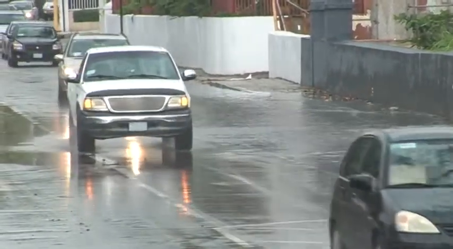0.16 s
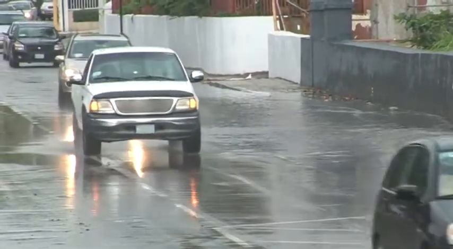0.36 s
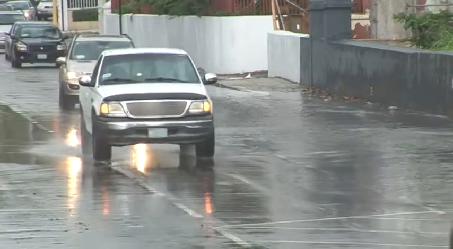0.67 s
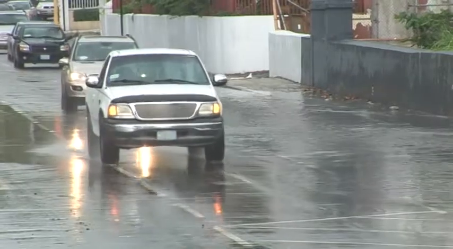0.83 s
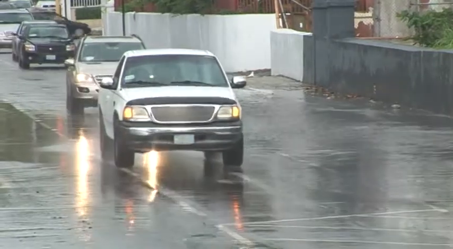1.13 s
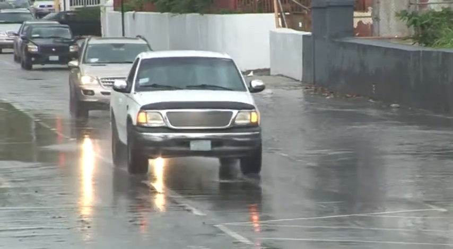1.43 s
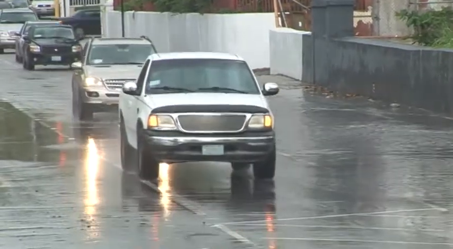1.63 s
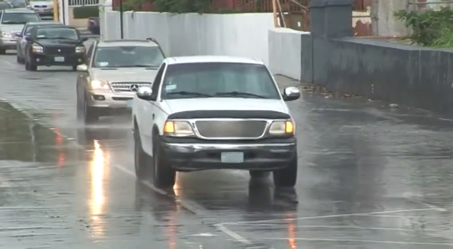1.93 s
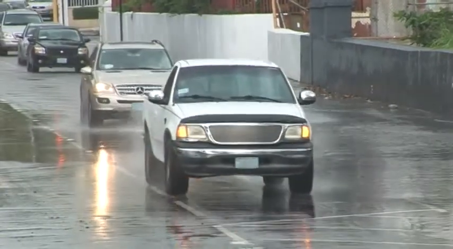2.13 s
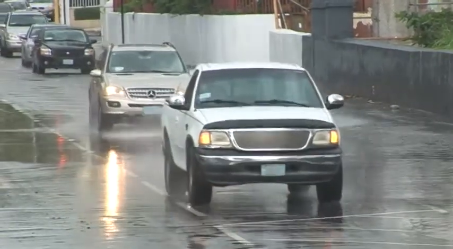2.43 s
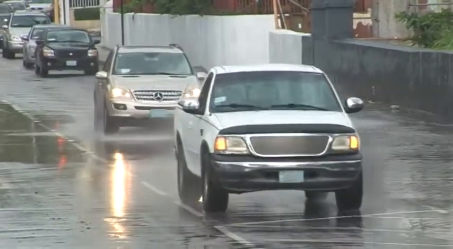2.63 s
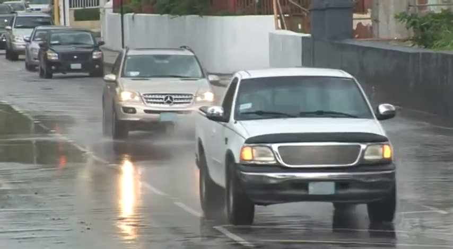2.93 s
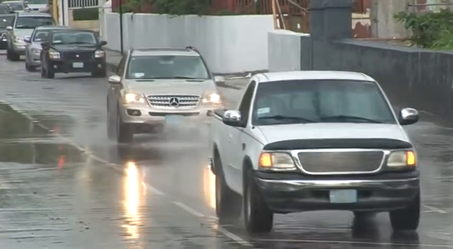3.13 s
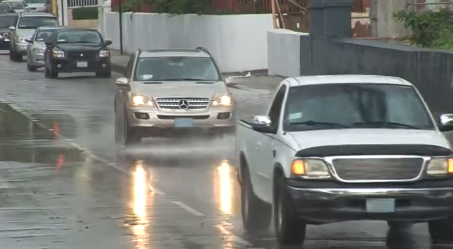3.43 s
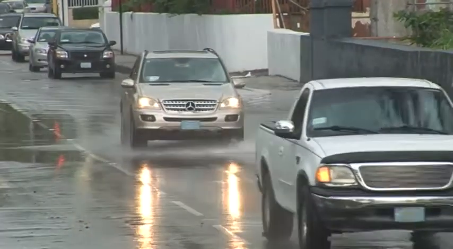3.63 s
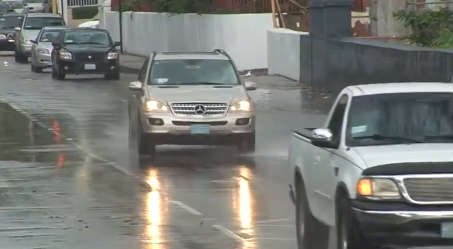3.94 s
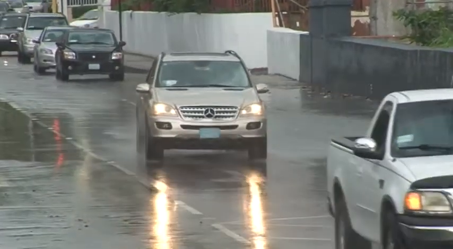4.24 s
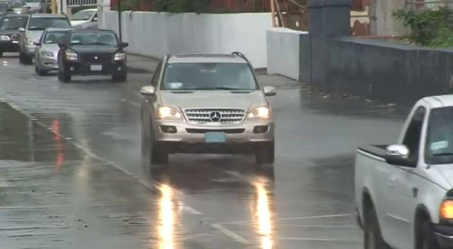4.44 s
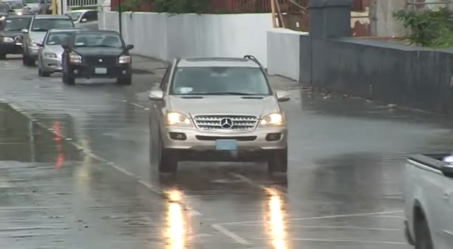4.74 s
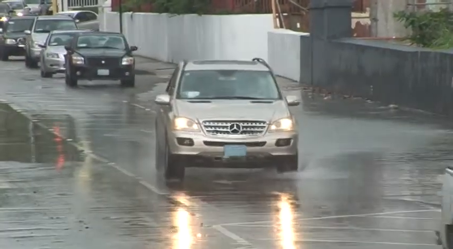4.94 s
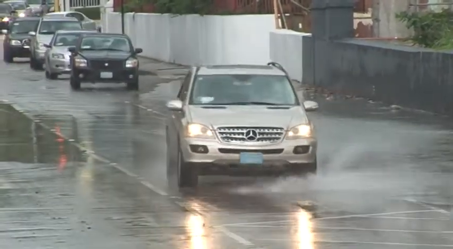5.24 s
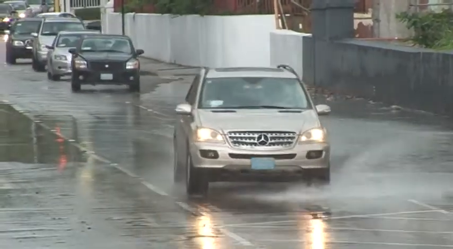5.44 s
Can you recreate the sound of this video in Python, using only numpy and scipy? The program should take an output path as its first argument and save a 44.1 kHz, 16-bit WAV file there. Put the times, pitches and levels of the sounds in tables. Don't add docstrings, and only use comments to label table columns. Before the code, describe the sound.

Steady wet-road tyre roar with watery surges; a pickup swells past on the right, engine humming, with a faint thin brake squeal.

```python
import sys
import numpy as np
from scipy import signal
from scipy.fft import rfft, irfft, next_fast_len
from scipy.io import wavfile
from scipy.ndimage import uniform_filter1d, map_coordinates

SR = 44100
rng = np.random.default_rng(int(sys.argv[2]) if len(sys.argv) > 2 else 0)


def inscribe(sig):
    pcm = np.round(np.clip(np.atleast_2d(sig).T, -1, 1) * 32767)
    wavfile.write(sys.argv[1], SR, pcm.astype(np.int16))


def volts_from_decibels(level):
    exponent = np.asarray(level, float) / 20
    return 10 ** exponent


N = 246519
STEP = 64
T_S = np.arange(N) / SR

IDLE_TONE = 84.3, -.45, -48, [(.75, .35, -40), (1.5, .7, -42), (2.9, .5, -45), (3.6, .3, -41),
             (4.2, .5, -36.5), (4.85, .4, -39), (5.59, .35, -34.5)]
DRONE_TONE = 146.5, -.95, -49, [(.4, .8, -45), (2.8, .25, -36.5), (3.4, .25, -39.5), (4.65, .5, -39.5),
              (5.4, .3, -45)]
PICKUP_TONE = 54.5, 2.8, -62, [(2.2, .25, -45), (2.7, .4, -45), (3.3, .4, -38), (3.9, .3, -41),
               (4.7, .3, -47)]
LEAVING_TONE = 168, -5, -70, [(.12, .25, -43)]
WHINE_TONES = [
    (292, 1.1, -75, [(.8, .4, -51)]),
    (360, -9.5, -75, [(3.85, .15, -47), (4.15, .15, -40.5), (4.6, .15, -45)]),
]
# t/s, half width/s, level/dB
EXHAUST_SWELLS = [
    (2.9, .2, -42),
    (3.58, .17, -34),
    (4.1, .35, -36.5),
    (5.5, .3, -43),
]
# f/Hz, density/dB
RUMBLE_SPECTRUM = [(12, -20), (22, -13), (30, -6), (45, 1.5), (65, -2.5), (100, -2), (128, -2.5),
                   (170, -6.5), (260, -56)]
BOOM_SPECTRUM = [(110, -18), (150, -0.5), (190, 0), (260, -0.5), (330, -6.5), (400, -12), (600, -37)]

# t/s, length/s, start f/Hz, end f/Hz, level/dB
SQUEALS = [
    (3.84, 0.038, 11960, 11850, -51),
    (4.08, .08, 11870, 11850, -62),
    (4.257, .3, 11720, 11830, -55),
]

# f/Hz, width/Hz, resting level/dB, swells [t/s, half width/s, level/dB], lean right/1
GROOVE_BANDS = [
    (556, 88, -54, [(1, .4, -53), (2.35, .25, -46), (2.8, .35, -41.5), (4.4, .3, -50)], .23),
    (1056, 190, -58, [(2.3, .45, -45), (3.05, .5, -41), (4.4, .55, -42)], .57),
]

# t/s, tyre level/dB, bearing/1 (0 ahead, 1 abeam right), nearness/1
PICKUP_PASS = [(0, -45.5, .35, .1), (.9, -42.3, .3, .4), (1.5, -39.3, .1, .17), (2, -38.5, .05, .36),
               (2.3, -36.5, .03, .56), (2.6, -35, .4, .5), (2.9, -32.8, .6, .66), (3.2, -32.8, .9, .55),
               (3.4, -34.5, 1, .8), (3.6, -36, 1, .61), (4.05, -36.3, .9, .45), (4.5, -38.6, .4, .22),
               (4.85, -40, .4, .15), (5.59, -38.8, .2, .2)]
# f/Hz, density/dB
FAR_ROAR_SPECTRUM = [(180, -23), (300, -19.5), (317, -19), (453, -4), (553, -5.5), (648, -7), (816, -11.5),
                     (979, -2.5), (1190, -5), (1490, -6), (2000, -4.5), (2600, -19), (4400, -120)]
NEAR_ROAR_SPECTRUM = [(180, -35), (300, -14.5), (325, -3), (402, -2.5), (536, -1), (623, -3.5), (778, -3.5),
                      (1030, 1), (1340, -8.5), (1610, -5.5), (2000, -25.5), (2600, -38), (4400, -120)]
# f/Hz, density/dB
SIDE_ROAR_SPECTRUM = [(35, -50), (60, -28), (241, -7), (319, -2), (407, -0.5), (676, -1.5), (923, 0),
                      (1440, 0), (1780, -6), (3000, -11), (3900, -37), (6600, -120)]
SIDE_PASS_SPECTRUM = [(35, -74), (60, -44), (121, -30), (195, -18), (319, -9), (363, -12), (496, -9),
                      (986, 0.5), (1280, -5.5), (2200, -15.5), (3000, -22), (3900, -49), (6600, -120)]
# f/Hz, in-phase share/1, quarter-cycle share/1
ROAR_COUPLING = [(100, 0.01, 0.18), (250, 0.53, -0.19), (400, -0.26, -0.64), (600, -0.19, -0.81),
                 (850, -0.37, -0.58), (1050, -0.48, -0.37), (1300, -0.21, -0.4), (1550, -0.97, 0.16),
                 (1900, -1, 0.0), (2500, -0.38, -0.2)]
WATER_COUPLING = [(1500, -0, -0.04), (1900, -0.6, -0.09), (2300, -0.6, -0.21), (2900, -0.16, -0.15),
                  (3500, 0.5, -0.16), (4000, 0.4, -0.24), (4500, -0.1, -0.3), (5000, -0.4, -0.26),
                  (5600, -0.15, -0.11), (6500, -0.06, -0.12), (7500, -0.09, -0.09)]
MIST_COUPLING = [(7500, -0.09, -0.09), (8500, -0.48, 0.18), (9500, -0.34, 0.22), (10500, -0.4, 0.16),
                 (11500, -0.57, -0.09), (12500, -0.6, -0.18), (13500, -0.62, -0.08), (14500, -0.53, 0.01),
                 (15500, -0.33, -0.14)]

# f/Hz, density/dB
SWISH_SPECTRUM = [(1300, -36), (1700, -7), (2150, 0.5), (2400, -1), (2600, 0), (2950, -4.5), (3300, -5),
                  (3800, -11.5), (4300, -22)]
SPLASH_SPECTRUM = [(1300, -38), (1800, -13), (2100, 1), (2400, 4), (2700, -5.5), (3100, 0), (3600, -7),
                   (4000, -9), (4400, -28)]
HISS_SPECTRUM = [(3300, -21), (3900, 0), (4600, -9), (5000, 0), (5450, -13), (5900, -9), (6500, -14),
                 (7600, -28)]
FAR_MIST_SPECTRUM = [(4470, -21), (7600, -10), (7810, -7), (8800, -5), (9760, -4.5), (10700, -3.5),
                     (11400, -1), (11900, 0), (13100, -4.5), (13800, -5), (15800, -11)]
NEAR_MIST_SPECTRUM = [(4470, -36), (7600, -19), (7810, -4), (8910, -12.5), (10600, -3), (11400, -4.5),
                      (12000, -2), (13400, 0), (14800, 6), (15200, 0), (15800, -12)]
# f/Hz, density/dB
SIDE_SWISH_SPECTRUM = [(1300, -28), (1750, 0), (2300, -7), (3000, -10), (3500, -15), (3900, -30)]
SIDE_HISS_SPECTRUM = [(3000, -32), (3500, -9), (4000, -3.5), (4600, -3.5), (5100, -7), (5800, -0.5),
                      (6500, -5.5), (7400, -20), (7700, -30)]
SIDE_MIST_SPECTRUM = [(4350, -36), (7400, -10), (8500, 0), (8950, 1.5), (10600, -8), (12200, -4),
                      (13700, -3.5), (15800, -12)]
# t/s, peak level/dB
BIG_DROPS = [(0.4923, -40), (0.5467, -38), (0.6285, -36), (0.7667, -36), (1.8836, -32), (2.5706, -41),
             (2.8988, -32), (3.1592, -34), (4.6209, -38)]
# t/s, swish level/dB
WATER_DEPTH = [(0, -39.3), (.6, -37.3), (1.5, -36.5), (1.9, -35.5), (2.5, -37.5), (3.56, -36.5), (4.1, -39),
               (5.1, -37.3), (5.59, -39)]
# t/s, length/s, coarse gain/dB, fine gain/dB
PUDDLE_HITS = [(.02, .05, 2.5, 1.2), (.42, .04, 2.5, 2.5), (.56, .05, 1.2, 2.2), (.685, .045, 4, 5),
               (.78, .05, 1.2, 2.5), (.94, .13, .3, 4), (1.14, .035, 2.5, 2.5), (1.36, .04, .6, 2.5),
               (1.665, .085, 7.5, 5.5), (1.85, .06, 1.2, 3), (1.97, .07, 1.2, 4.5), (2.1, .028, 3.5, 8),
               (2.44, .05, 1.5, 2.5), (2.6, .08, .3, 2.5), (2.74, .1, -.3, 2.5), (2.87, .1, -.6, 4),
               (3.03, .06, -.6, 4.5), (3.32, .04, -.3, 2.5), (3.53, .025, -1.5, -3), (3.66, .05, .6, 1.5),
               (3.87, .2, .3, 3), (4.4, .15, .3, 3), (4.95, .15, .6, 2.5), (5.16, .05, .3, 2.2),
               (5.45, .07, .6, .6)]
# level/dB (0: depth mean), depth follow/1, fade/(dB/s), coarse share/1, fine share/1,
# wake gain/dB, sideways level/dB, extra abeam/dB
SWISH_LAYER = (0, 1, 0, 1, 0, 0, -15, 7)
HISS_LAYER = (-47.8, .1, .2, .5, .05, 2.6, 1.6, .1)
SPRAY_LAYER = (-51.9, .3, -.42, .1, .95, 8.5, -1.4, .1)

# start t/s, end t/s, dip depth/dB
TREBLE_DIPS = [
    (1.59, 2.17, -14),
    (2.23, 2.67, -13),
    (2.73, 2.87, -11),
    (2.98, 3.1, -6),
    (3.3, 3.85, -3.5),
]

AHEAD_DB, ABEAM_DB = -9, 1.1
FAR_DB, NEAR_DB = -48, -24
RUMBLE_DB, RUMBLE_SWING_DB = -43.5, 11
BOOM_DB, BOOM_SWING_DB = -46, 7
WAKE_S, WAKE_FULL_S, WAKE_END_S, WAKE_FALL_S = 3.02, 3.32, 3.7, .1
RISE_SHARE = .6


def unit(x):
    return x / np.sqrt(np.mean(x ** 2) + 1e-20)


def curves(rows):
    t_s, *columns = np.transpose(rows)
    return [np.interp(T_S, t_s, column) for column in columns]


def along(rows, hz):
    f_hz, *columns = np.transpose(rows)
    return [np.interp(np.log(hz + 1), np.log(f_hz + 1), column) for column in columns]


def smooth(slow):
    return np.interp(np.arange(N), np.arange(0, N, STEP), slow)


def wobble(rate_hz):
    knots = rng.standard_normal(int(N * rate_hz / SR) + 4)
    return smooth(map_coordinates(knots, [np.arange(0, N, STEP) * rate_hz / SR]))


def swells(rest_db, rows):
    t_s, width_s, db = np.transpose(rows)[..., None]
    bells = np.exp(-2 * ((T_S[::STEP] - t_s) / width_s) ** 2)
    power = smooth((volts_from_decibels(db) ** 2 * bells).sum(0))
    return 10 * np.log10(volts_from_decibels(rest_db) ** 2 + power)


def filtered(x, response):
    size = next_fast_len(N + 8192)
    return irfft(rfft(x, size) * response(np.fft.rfftfreq(size, 1 / SR)), size)[..., :N]


def coloured(x, spectrum):
    def response(hz):
        inside = (hz >= spectrum[0][0]) & (hz <= spectrum[-1][0])
        return volts_from_decibels(along(spectrum, hz)[0]) * inside
    return unit(filtered(x, response))


def patchy(patchy_db):
    z = signal.stft(rng.standard_normal((2, N)), nperseg=512)[2]
    field = uniform_filter1d(rng.standard_normal(z.shape[1:]), size=8, axis=0)
    field = uniform_filter1d(field, size=10, axis=1)
    return unit(signal.istft(z * volts_from_decibels(patchy_db * unit(field)), nperseg=512)[1][:, :N])


def sideways(pair, coupling):
    def response(hz):
        common = np.dot([1, 1j], along(coupling, hz))
        unrelated = np.sqrt(np.clip(1 - abs(common) ** 2, 0, 1))
        return np.array([common, unrelated])
    return filtered(pair, response).sum(0)


def pickup():
    level_db, bearing, near = curves(PICKUP_PASS)
    return level_db, AHEAD_DB + (ABEAM_DB - AHEAD_DB) * bearing, near, bearing


def engines():
    near = (pickup()[0] - FAR_DB) / (NEAR_DB - FAR_DB)
    low, high = patchy(patchy_db=0.37)
    boom_db = swells(BOOM_DB + BOOM_SWING_DB * near, EXHAUST_SWELLS)
    boom = volts_from_decibels(boom_db) * coloured(high, BOOM_SPECTRUM)
    front = boom + volts_from_decibels(RUMBLE_DB + RUMBLE_SWING_DB * near) * coloured(low, RUMBLE_SPECTRUM)
    # order, level/dB
    for tone, overtones in (
            (IDLE_TONE, [(2, -19)]),
            (DRONE_TONE, [(1.5, -19.5)]),
            (PICKUP_TONE, [(2, -7), (3, -5), (4, -8)]),
            (LEAVING_TONE, [(1.5, -7)]),
            (WHINE_TONES[0], []),
            (WHINE_TONES[1], [])):
        start_hz, glide_hz_per_s, rest_db, throttle = tone
        hz = (start_hz + glide_hz_per_s * T_S) * (1 + .003 * wobble(7.08))
        level_db = swells(rest_db, throttle)
        phase = 2 * np.pi * np.cumsum(hz) / SR
        for order, order_db in [(0.99, 0)] + overtones:
            gain = np.sqrt(2) * volts_from_decibels(level_db + order_db + 0.88 * wobble(6.6))
            front = front + gain * np.sin(order * phase)
    return np.array([front, 0.068 * boom])


def brake():
    out = np.zeros(N)
    for t_s, length_s, start_hz, end_hz, db in SQUEALS:
        n = round(length_s * SR)
        phase = 2 * np.pi * np.cumsum(np.linspace(start_hz, end_hz, n)) / SR
        out[round(t_s * SR):][:n] += volts_from_decibels(db) * np.hanning(n) ** 0.59 * np.sin(phase)
    return out * volts_from_decibels(4 * wobble(70)) * np.array([[1], [-.7]])


def narrow(hz, width_hz):
    noise = rng.standard_normal((2, N))
    a, b = filtered(noise, lambda f: 1 / (1 + (2 * f / width_hz) ** 2))
    phase = 2 * np.pi * np.cumsum(hz) / SR
    return unit(a * np.cos(phase) + b * np.sin(phase))


def tread():
    swing = volts_from_decibels(pickup()[1])
    out = np.zeros((2, N))
    for hz, width_hz, rest_db, rows, lean in GROOVE_BANDS:
        band = volts_from_decibels(swells(rest_db, rows)) * narrow(np.full(N, hz), width_hz)
        out += band * np.array([np.ones(N), -lean * swing])
    return out


def tyres():
    level_db, side_db, near, _ = pickup()
    near = np.clip(near, 0, 1)
    abeam = np.clip((side_db + 8.5) / 6, 0, 1)
    pair = patchy(patchy_db=0.72)
    front = (1 - near) * coloured(pair[0], FAR_ROAR_SPECTRUM) + near * coloured(pair[0], NEAR_ROAR_SPECTRUM)
    across = sideways(pair, ROAR_COUPLING)
    side = (1 - abeam) * coloured(across, SIDE_ROAR_SPECTRUM) + abeam * coloured(across, SIDE_PASS_SPECTRUM)
    return volts_from_decibels(level_db + 0.27 * wobble(14)) * np.array([front, volts_from_decibels(side_db) * side])


def droplets(size_db, count):
    place, sign = rng.random((count, 2)).T
    size = volts_from_decibels(size_db * np.clip(rng.standard_normal(count), -2.2, 2.2)) * np.sign(sign - .5)
    return unit(np.bincount((place * N).astype(int), size, N))


def big_drops():
    impacts = np.zeros(N)
    for t_s, db in BIG_DROPS:
        impacts[round(t_s * SR)] = volts_from_decibels(db + 9.0)
    rms = np.sqrt(np.mean(impacts ** 2))
    return coloured(impacts, FAR_MIST_SPECTRUM) * rms * np.array([[1], [-.4]])


def thrown(layer):
    base_db, follows, fade_db_per_s, coarse, fine, wake_db, side_db, abeam_db = layer
    depth_db, = curves(WATER_DEPTH)
    mean_db = depth_db.mean()
    t_s, length_s, coarse_db, fine_db = np.transpose(PUDDLE_HITS)[..., None]
    late_s = T_S[::STEP] - t_s
    bell = np.exp(-(late_s / np.where(late_s < 0, RISE_SHARE * length_s, length_s)) ** 2)
    puddle_db = smooth((bell * (coarse * coarse_db + fine * fine_db)).sum(0))
    wake = np.interp(T_S, [WAKE_S, WAKE_FULL_S, WAKE_END_S, WAKE_END_S + WAKE_FALL_S], [0, 1, 1, 0])
    level_db = (base_db or mean_db) + follows * (depth_db - mean_db) + fade_db_per_s * T_S
    return level_db + wake_db * wake + puddle_db, side_db + abeam_db * pickup()[3] ** 4


def water():
    hits = np.array([droplets(size_db=2.5, count=12000), droplets(size_db=4, count=12000)])
    surge = .8 * wobble(36) + 0.74 * wobble(140)
    out = big_drops()
    splash = (thrown(SWISH_LAYER)[0] + 36) / 6
    close_by = 0.74 * (pickup()[2] - .3)
    lean = 0.44 * np.clip(close_by, 0, 1)
    for layer, near, far_spectrum, near_spectrum, side_spectrum, coupling, grain, surge_db in (
            (SWISH_LAYER, splash, SWISH_SPECTRUM, SPLASH_SPECTRUM, SIDE_SWISH_SPECTRUM, WATER_COUPLING, .36, .7),
            (HISS_LAYER, close_by, HISS_SPECTRUM, HISS_SPECTRUM, SIDE_HISS_SPECTRUM, WATER_COUPLING, .3, .6),
            (SPRAY_LAYER, close_by, FAR_MIST_SPECTRUM, NEAR_MIST_SPECTRUM, SIDE_MIST_SPECTRUM,
             MIST_COUPLING, .46, .9)):
        level_db, side_db = thrown(layer)
        near = np.clip(near, 0, 1)
        pair = patchy(patchy_db=0.54) + grain * hits
        front = (1 - near) * coloured(pair[0], far_spectrum) + near * coloured(pair[0], near_spectrum)
        across = volts_from_decibels(side_db) * coloured(sideways(pair, coupling), side_spectrum) - lean * front
        out = out + volts_from_decibels(level_db + surge_db * surge) * np.array([front, across])
    return out


def treble_dip():
    depth_db = sum(db * ((T_S > start_s) & (T_S < end_s)) for start_s, end_s, db in TREBLE_DIPS)
    return uniform_filter1d(depth_db, size=2000)


def scene():
    return engines() + brake() + tread() + tyres() + water()


def band_limit(x):
    return signal.sosfilt(signal.butter(12, 15900, fs=SR, output="sos"), x)


def record(dry):
    front, side = filtered(dry, lambda hz: hz < 15760)
    front = filtered(front, lambda hz: volts_from_decibels(-7 * np.exp(-((hz - 7870) / 260) ** 4)))
    dip_band = filtered(front, lambda hz: np.exp(-((hz - 7300) / 950) ** 6))
    front = front + (volts_from_decibels(treble_dip()) - 1) * dip_band
    return band_limit(np.array([front + side, front - side]))


dry = scene()
out = record(dry)
inscribe(out)
```